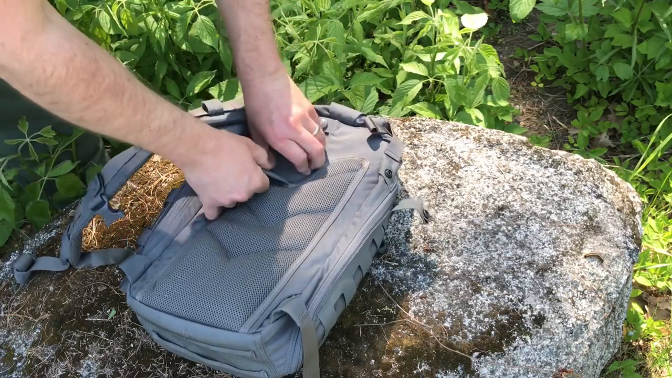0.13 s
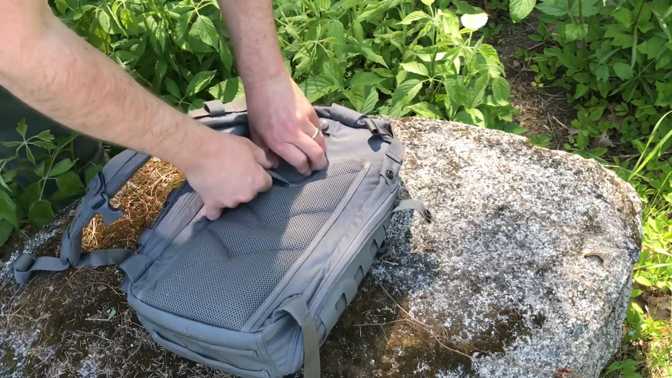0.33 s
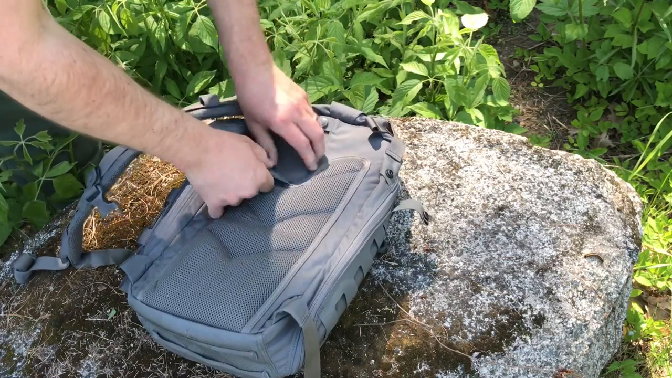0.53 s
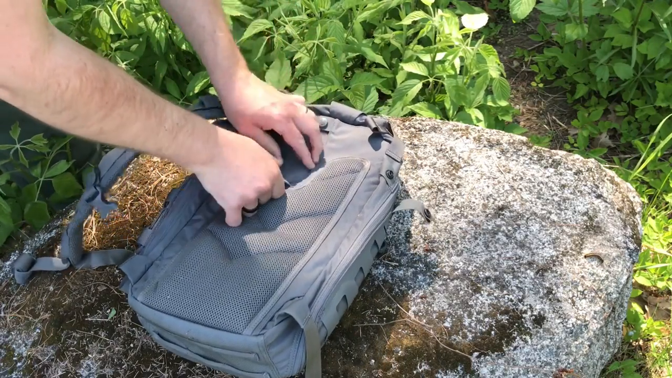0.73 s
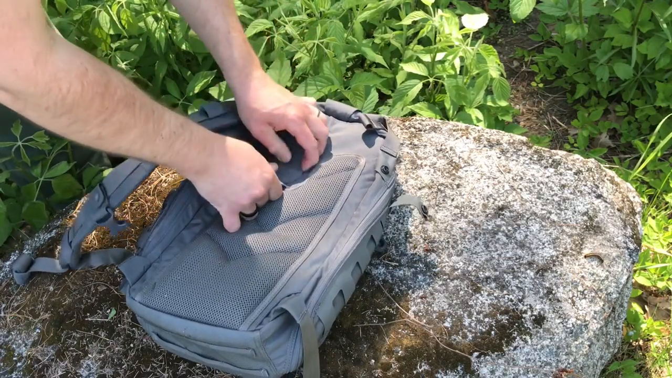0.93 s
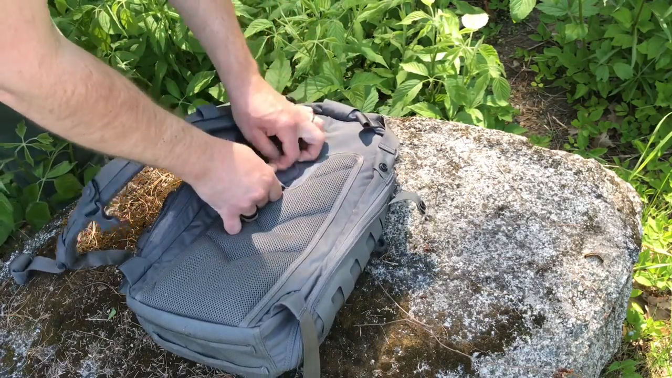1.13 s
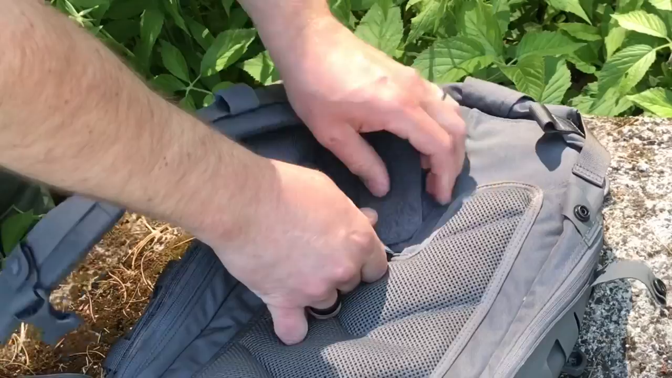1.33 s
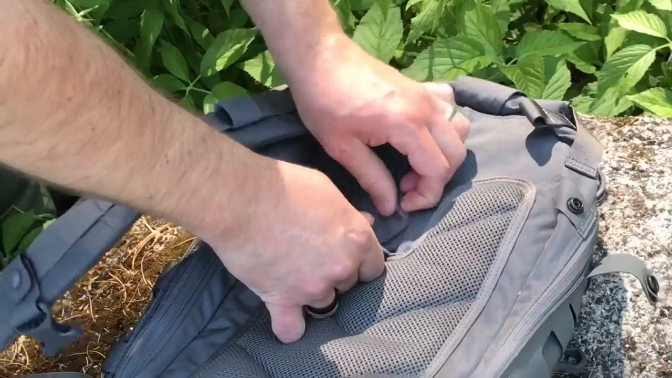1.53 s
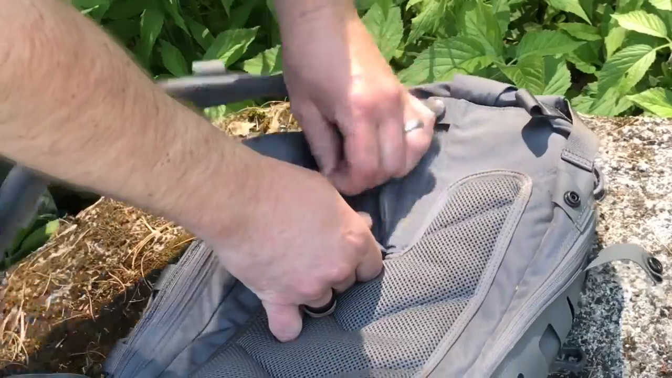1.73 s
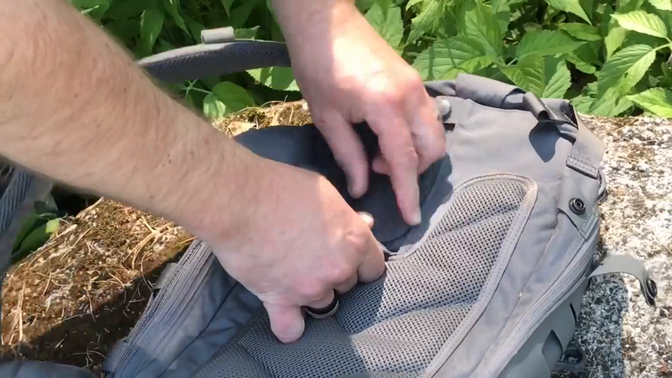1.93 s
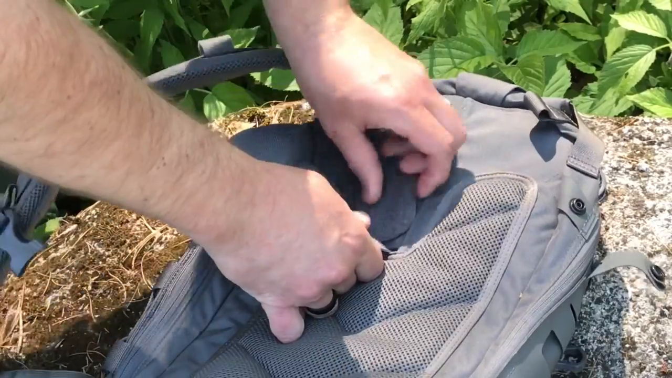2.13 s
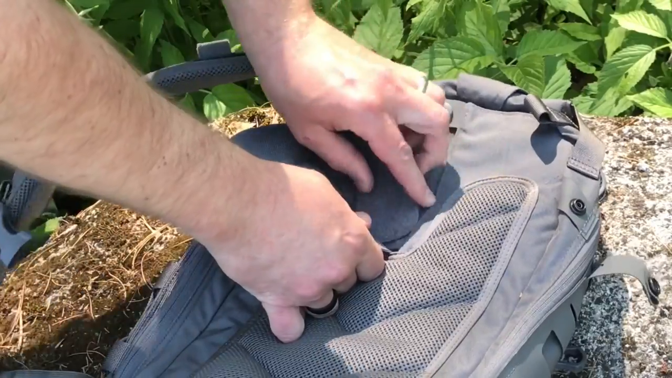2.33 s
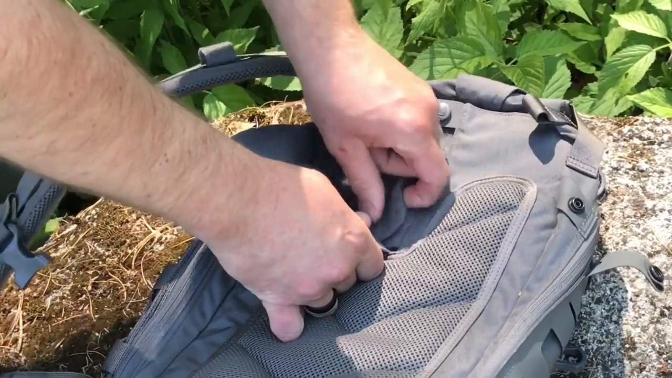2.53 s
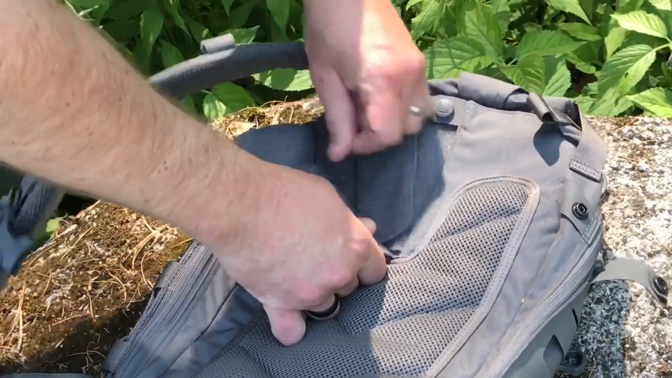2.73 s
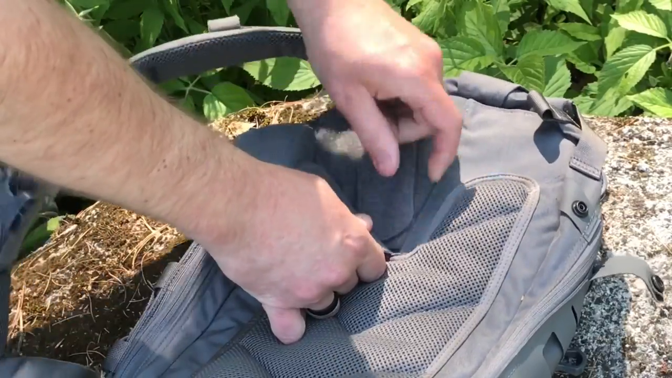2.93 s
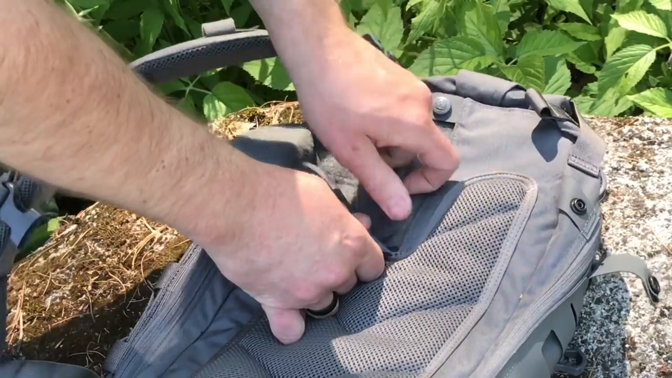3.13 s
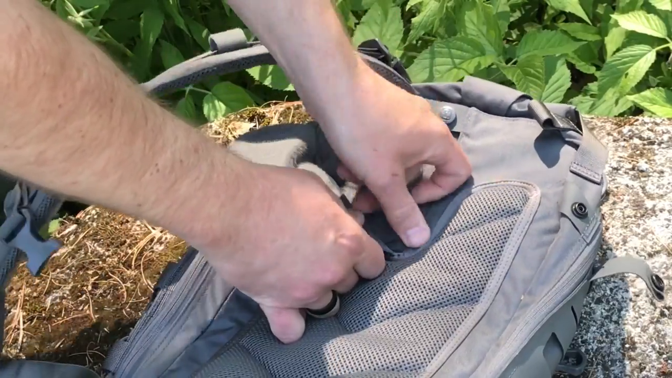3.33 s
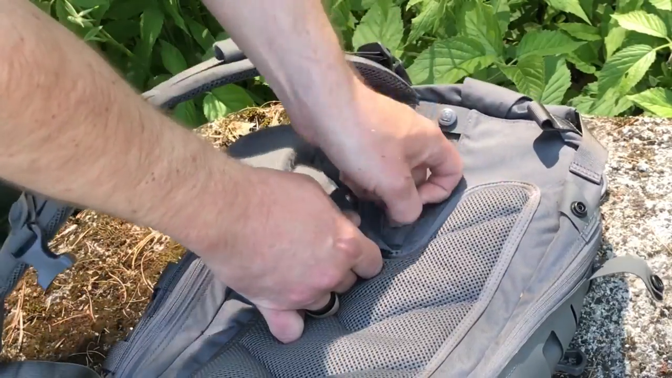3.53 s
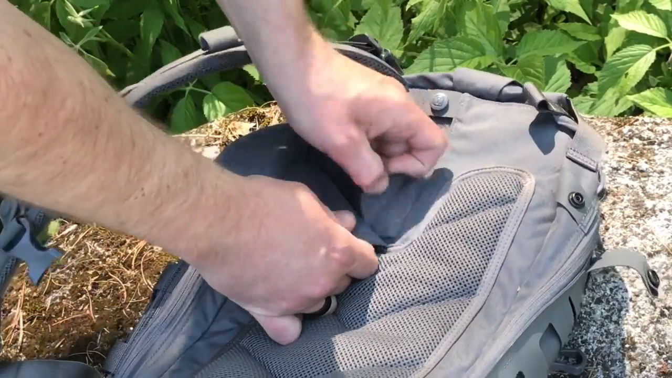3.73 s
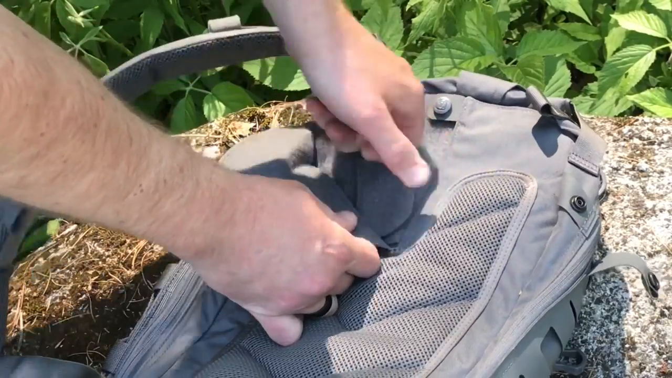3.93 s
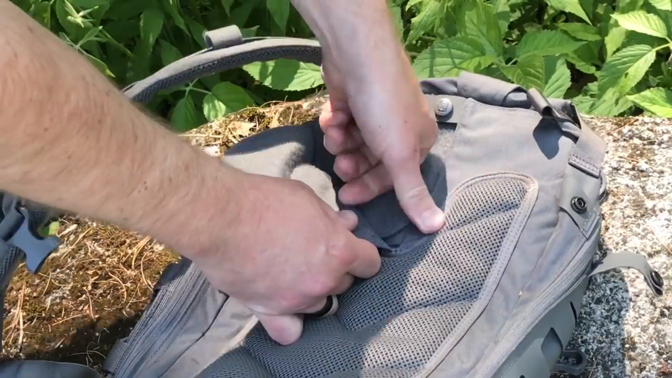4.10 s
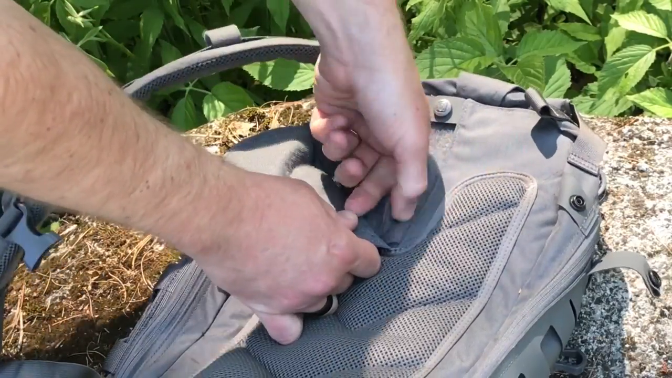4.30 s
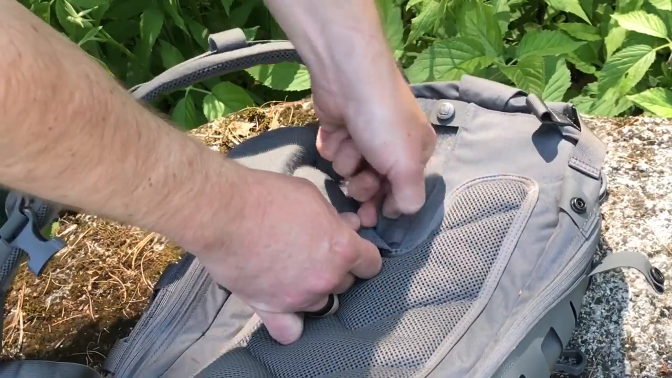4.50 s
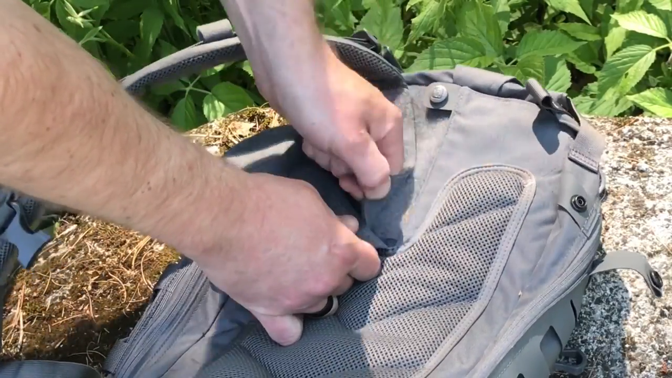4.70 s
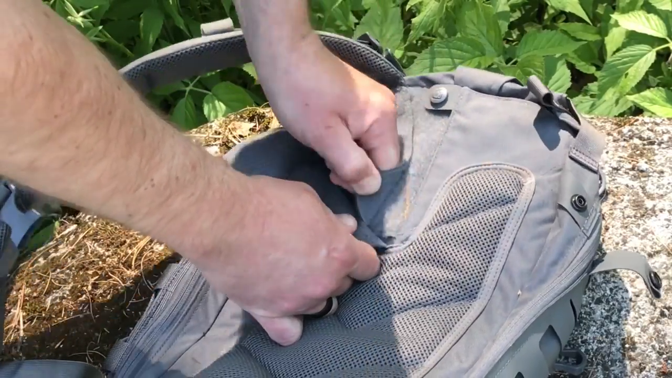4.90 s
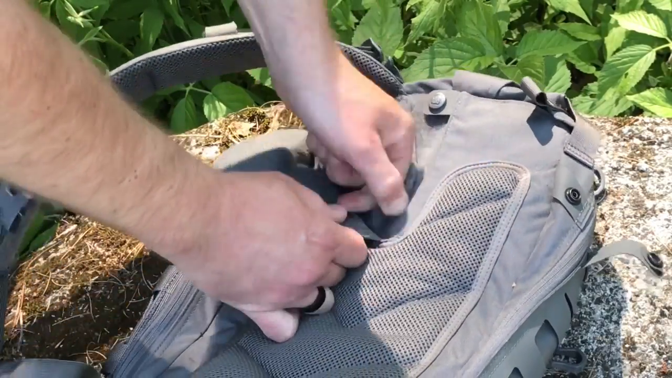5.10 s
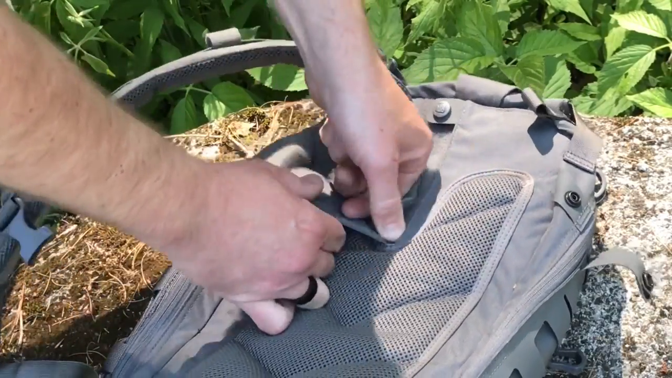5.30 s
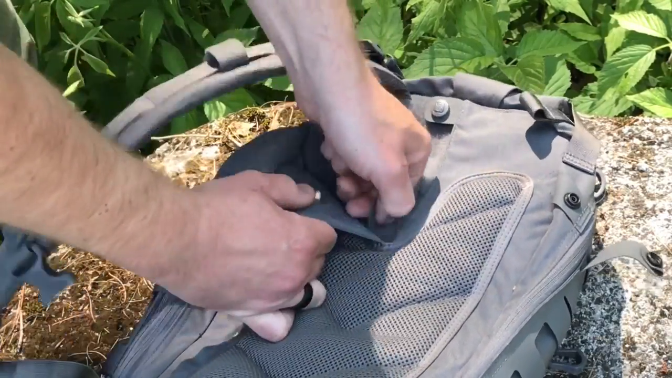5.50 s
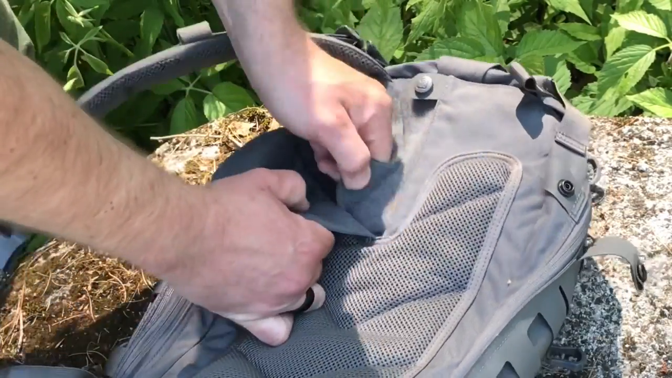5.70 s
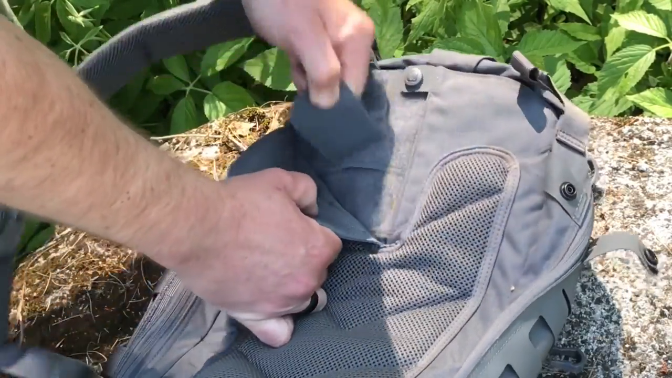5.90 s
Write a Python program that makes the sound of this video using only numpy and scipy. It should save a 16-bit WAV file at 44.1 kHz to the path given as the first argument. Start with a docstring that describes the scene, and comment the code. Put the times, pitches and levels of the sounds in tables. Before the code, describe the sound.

Close crisp clusters of hook-and-loop snaps and brief peels, with fabric rubs and dull padding flops between, ending on a sustained harsh rip.

```python
"""Outdoors and close by, over a low distant hum, a grip on a nylon backpack opens with a short rubbery creak.
A hand rubs the cloth, fingertips scuff the stretched panel and padding flops dully between tugs on the flap.
Hook-and-loop fastening lets go in snapping clusters and short peels; each click cracks, rings the taut panel
and knocks on the hollow bag. Last, the flap is torn open in one long rip that lasts to the end.
Filtered noise makes air and cloth, sines make hum and creak, and clicks through resonances make the flap."""
import sys
import numpy as np
from scipy import signal
from scipy.fft import rfft, irfft
from scipy.io import wavfile
from scipy.ndimage import uniform_filter1d

SR = 44100
rng = np.random.default_rng(int(sys.argv[2]) if len(sys.argv) > 2 else 0)


def transcribe(signal):
    """Save signal, clipped to [-1, 1], as a 16-bit WAV file at the path in sys.argv[1]."""
    frames = np.atleast_2d(signal).T
    limited = np.clip(frames, -1, 1)
    pcm = np.round(limited * 32767).astype(np.int16)
    wavfile.write(sys.argv[1], SR, pcm)


N = 266849
TIME = np.arange(N) / SR


def from_db(db):
    """Decibels to amplitude."""
    return 10 ** (np.asarray(db) / 20)


def rms_one(x):
    """Scale to a spread of 1."""
    return x / np.std(x)


def gain_curve(rows, column):
    """A level column [dB] as a gain over time, silent outside its rows."""
    rows = np.array(rows)
    return from_db(np.interp(TIME, rows[:, 0], rows[:, column], left=-np.inf, right=-np.inf))


def drift(rate):
    """Smooth chance with about `rate` turns a second; spread 1."""
    return rms_one(np.interp(TIME * rate, np.arange(N), rng.standard_normal(N)))


def swells(strokes):
    """Each stroke grows and fades in a bell-shaped swell."""
    return sum(from_db(db) * np.exp(-((TIME - middle) / length) ** 2) for middle, length, db in strokes)


def grains(per_s, spread_db):
    """Clicks at random moments, of uneven size and sign; rms 1."""
    sizes = from_db(spread_db * np.clip(rng.standard_normal(N), -2, 2))
    signs = rng.choice([-1, 1], N)
    return rms_one(sizes * signs * (rng.random(N) < per_s / SR))


def resonance(x, hz, width_hz):
    """One resonance, gain 1 on top."""
    return signal.lfilter(*signal.iirpeak(hz, hz / width_hz, fs=SR), x)


def coloured(x, spectrum, ripple_db=0, size=4096, count=60):
    """A causal filter of unit energy with this spectrum, plus chance resonances of ripple_db."""
    octave = np.log2(np.maximum(np.fft.rfftfreq(size, 1 / SR), 10))
    hz, db = np.transpose(spectrum)
    knots = np.log2(hz)
    skirts = 20 * np.abs(octave - np.clip(octave, knots[0], knots[-1]))   # 20 dB per octave beyond the ends
    ripple = np.interp(octave, np.linspace(octave[0], octave[-1], count), rng.standard_normal(count))
    level_db = np.interp(octave, knots, db) - skirts + ripple_db * ripple
    cepstrum = irfft(np.log(from_db(level_db)))
    response = irfft(np.exp(rfft(2 * cepstrum[:size // 2], size)))   # minimum phase: nothing sounds early
    return signal.oaconvolve(x, response / np.linalg.norm(response))[:N]


def scattered(clicks, spectrum, ripple_db, count=18, size=130):
    """The contact hops between spots of the fabric every 3 ms, each with resonances of its own."""
    spot = np.repeat(rng.integers(count, size=N // size + 1), size)[:N]
    return sum(coloured(clicks * (spot == k), spectrum, ripple_db) for k in range(count))


# colour of the still air: (frequency [Hz], relative level [dB])
AIR_COLOUR = [(25, -26.5), (78, 5), (130, -11.5), (260, -13), (800, -20.5), (16000, -37.5)]
# far hum partials, before they waver: (frequency [Hz], level at the start [dB], fade [dB per s])
HUM_PARTIALS = [(70, -52.5, 2), (103.4, -52.5, 8), (209.7, -56, 3.5)]


def background(air_db=-52, waver_db=2, wander_rad=.6, rate=6):
    """Still air as coloured noise, with far hum partials that waver and slowly fade."""
    sound = from_db(air_db) * coloured(rng.standard_normal(N), AIR_COLOUR)
    for hz, db, fade in HUM_PARTIALS:
        level = from_db(db - fade * TIME + waver_db * drift(rate))
        sound = sound + level * np.sin(2 * np.pi * hz * TIME + wander_rad * drift(rate))
    return sound


# colour of rubbed nylon: (frequency [Hz], relative level [dB])
NYLON_COLOUR = [(200, 3.5), (800, 1), (1450, 1), (2300, -0.5), (6000, -5.5), (8500, -1.5), (10400, -5.5),
                (12500, -0.5), (16000, -10)]
# strokes of a hand over the nylon: (middle time [s], half length [s], relative level [dB])
HAND_RUBS = [(.18, 0.066, -59.5), (.5, 0.046, -53), (.77, 0.16, -62), (1.14, 0.33, -63.5),
             (1.48, 0.15, -59.5), (1.81, 0.13, -48.5), (2.2, 0.06, -56), (3.363, 0.0048, -44),
             (3.48, 0.14, -59.5), (4.85, 0.26, -63), (5.29, 0.0086, -44.5), (5.45, 0.26, -54.5)]


def cloth(rub_db=3.0, grip_db=-68.5, flutter_db=10.5, crease_db=-7):
    """Skin drags over the weave in fine grains, a little unevenly; now and then a crease ticks."""
    friction = from_db(flutter_db * np.tanh(drift(63))) * grains(9000, spread_db=5.5)
    creases = from_db(crease_db) * grains(120, spread_db=9)
    pressure = from_db(grip_db) + swells(HAND_RUBS)   # a faint constant grip under the strokes
    return from_db(rub_db) * scattered((friction + creases) * pressure, NYLON_COLOUR, ripple_db=4.5)


# a short rubbery creak as the grip tightens: (time [s], mean slip rate [per s], level [dB])
GRIP_CREAK = [(.01, 260, -64), (.048, 390, -38.5), (.09, 200, -52)]


def creak(sharpness=1.0, jitter=0.11):
    """Stick and slip, speeding up and slowing again."""
    s, rate, _ = np.transpose(GRIP_CREAK)
    slip_rate = np.interp(TIME, s, rate) * (1 + jitter * drift(211))
    phase = 2 * np.pi * np.cumsum(slip_rate) / SR
    return gain_curve(GRIP_CREAK, 2) * np.sin(phase + sharpness * np.sin(2 * phase))


# the flap goes slack or a finger bumps the padding: (time [s], relative level [dB], swing pitch [Hz])
PADDING_FLOPS = [(0.877, -39.5, 377), (0.986, -32.5, 473), (1, -38.5, 520), (1.172, -23, 400),
                 (2.098, -35.5, 376), (2.59, -28, 349), (2.815, -25, 298), (3.363, -41.5, 352),
                 (3.878, -32.5, 177), (4.543, -27, 596)]


def flops(cycles=0.86, crumple=0.92):
    """Padded cloth swings for a cycle or two and crumples dully."""
    out, t = np.zeros(N), TIME[:SR // 10]
    for s, db, hz in PADDING_FLOPS:
        age = t * hz / cycles
        band = signal.butter(2, [hz / 2, hz * 2], "band", fs=SR)
        dull = rms_one(signal.lfilter(*band, rng.standard_normal(len(t))))
        swing = np.sin(2 * np.pi * hz * t) / 2
        at = int(s * SR)
        out[at:at + len(t)] += from_db(db) * age * np.exp(1 - age) * (swing + crumple * dull)
    return out


# a fingertip scuffs the stretched panel: (middle time [s], half length [s], level [dB], ring pitch [Hz])
FINGER_SCUFFS = [(0.516, 0.011, -44, 1020), (1.265, 0.0035, -34, 1550), (1.497, 0.0048, -38, 1550),
                 (1.833, 0.029, -37.5, 1650), (1.92, 0.0023, -33.5, 1060), (2.179, 0.017, -43, 1650),
                 (2.282, 0.013, -45.5, 1120), (5.186, 0.052, -45.5, 1428), (5.289, 0.018, -42, 1600),
                 (5.357, .01, -41, 650)]


def scuffs(width_share=0.73):
    """Dense friction grains swell in one resonance of the panel, pitched by where the finger presses."""
    friction = grains(1700, spread_db=8.5)
    sound = np.zeros(N)
    for middle, length, db, hz in FINGER_SCUFFS:
        once = resonance(friction, hz, width_share * hz)
        twice = resonance(once, hz, width_share * hz)   # steeper sides
        sound += swells([(middle, length, db)]) * rms_one(twice)
    return sound


# each tug on the flap sets off a crackle of small snaps and tunes the panel:
# (start time [s], length [s], relative crackle level [dB], panel over crack drive [dB], ring pitch [Hz])
FLAP_TUGS = [(.9, 0.076, -40, 2, 2220), (1.068, 0.13, -18, -2.5, 1670), (1.514, 0.18, -20, -3.5, 1411),
             (2.645, 0.15, -10, -6, 1400), (3.487, 0.093, -14, -6, 1345), (3.645, 0.19, -11.5, -6, 1450),
             (4.382, 0.073, -17.5, -6.5, 1570), (4.545, 0.078, -20, -7.5, 1496),
             (4.667, 0.135, -19.5, -5.5, 1234), (4.824, 0.13, -21, -3, 1264),
             (5.018, 0.08, -11.5, -2, 1131), (5.429, 0.1, -28, 0.5, 1485), (5.733, 0.16, -7, -2.5, 1639)]


def tension(s, slack_db=-10):
    """Panel drive [dB] and ring pitch [Hz] at time s: slack at first, steady in a tug, gliding between tugs."""
    held = np.array([(at, db, hz) for start, length, _, db, hz in FLAP_TUGS
                     for at in (start, start + length)])
    panel_db = np.interp(s, held[:, 0], held[:, 1], left=slack_db)
    return panel_db, np.interp(s, held[:, 0], held[:, 2])


def crackle(snaps_per_s=135, jitter=0.61, spread_db=4.5, hold_s=.009, count=40):
    """In a tug the load builds and slips unevenly: small snaps (time, level), held back before a big one."""
    snaps, big = [], np.array(BIG_SNAPS)[:, 0]
    for start, length, db, _, _ in FLAP_TUGS:
        late, size = rng.standard_normal((2, count))
        times = start + (np.arange(count) + .5 + jitter * late) / snaps_per_s   # jitter: share of the interval
        for s, z in zip(times, size):
            holding = np.any((big > s) & (big < s + hold_s))
            if s < start + length and not holding:
                snaps.append((s, db + spread_db * z))
    return snaps


# big clusters of hooks that stand out alone: (time [s], relative level [dB])
BIG_SNAPS = [(.283, -11.5), (.318, -16), (.908, -11.5), (0.948, -8.5), (.969, -17), (1.032, -18),
             (1.095, -9), (1.106, -9), (1.113, -11), (1.121, -5.5), (1.133, -9.5), (1.198, -4),
             (1.211, -14), (1.283, -11.5), (1.555, -5), (1.574, -6), (1.598, -11), (1.611, -4.5),
             (1.643, -2.5), (1.649, -7), (1.657, -2.5), (1.67, -11.5), (1.807, -8), (1.957, -17.5),
             (2.096, -17), (2.513, -17), (2.538, -7), (2.565, -5.5), (2.59, -0.5), (2.645, -4), (2.651, 4),
             (2.673, -0.5), (2.685, 1.5), (2.689, 0.5), (2.716, -18), (2.729, 3.5), (2.746, -3.5),
             (2.767, 4.5), (2.776, 2), (3.222, -8.5), (3.243, -1.5), (3.252, -7.5), (3.501, -4), (3.536, 0),
             (3.545, 4), (3.643, -6), (3.654, -5), (3.701, -9.5), (3.775, -2.5), (3.786, -6), (3.83, -0.5),
             (4.368, -7), (4.386, -0.5), (4.398, -0.5), (4.403, -3), (4.413, -2.5), (4.425, -9.5),
             (4.433, -3.5), (4.479, -8), (4.501, -10.5), (4.542, -1), (4.573, -1.5), (4.595, -5.5),
             (4.615, -8.5), (4.664, -7), (4.672, -4), (4.688, -4.5), (4.708, -1), (4.712, -3),
             (4.738, -6.5), (4.744, -6.5), (4.77, -6), (4.779, -9.5), (4.833, -8), (4.842, -1.5),
             (4.855, -6.5), (4.865, -4.5), (4.88, -7), (4.89, -10.5), (4.923, -7.5), (4.929, -6.5),
             (4.959, -8), (5.022, -3), (5.03, -6.5), (5.045, -9.5), (5.063, -4), (5.069, -9.5),
             (5.092, -10.5), (5.113, -14), (5.45, -13.5), (5.532, -13), (5.574, -11), (5.602, -10.5),
             (5.675, -8.5), (5.689, -4), (5.697, 0), (5.711, -2), (5.725, -8)]


def snap_clicks(spread_s=.0014, fall_db=8.5, strong_db=-3.5, growth=.035,
                stray_db=-14, stray_after_s=.0015, stray_s=0.0046, count=7, size=600):
    """A hook throws its load on its neighbours: after a harder snap they follow stronger and wider spread."""
    clicks, shape = np.zeros(N + SR), (size, count)
    lags, signs = rng.uniform(-2, 2, shape), rng.choice([-1, 1], shape)
    stray_lags, stray_sizes = rng.standard_normal(shape), rng.laplace(size=shape)
    snaps = BIG_SNAPS + crackle()
    for (s, db), lag, sign, stray_lag, stray_size in zip(snaps, lags, signs, stray_lags, stray_sizes):
        avalanche = np.exp(growth * (db - strong_db))
        delays = spread_s * avalanche * lag
        delays[0] = 0
        sizes = from_db(-fall_db / avalanche * np.sqrt(np.arange(count))) * sign
        at = ((s + spread_s / 2 + delays) * SR).astype(int)
        clicks[at] += from_db(db) * sizes / np.linalg.norm(sizes)
        # weakly held hooks slip just before and, more often, just after
        strays = s + avalanche * (stray_after_s + stray_s * stray_lag)
        clicks[(strays * SR).astype(int)] += from_db(db + stray_db) * avalanche * stray_size / 2
    return clicks[:N]


# continuous peels, the last two tear the flap open; levels are drives at mid-peel: (start time [s],
# length [s], crack level [dB], panel ring level [dB], bag hollow level [dB], swell [dB per s])
FLAP_PEELS = [(1.153, 0.018, -29.5, -31.5, -41, 202), (1.717, 0.028, -33.5, -37.5, -53, 60),
              (1.744, 0.057, -23, -23.5, -33.5, -84), (2.775, 0.039, -31, -35, -51.5, -3),
              (3.716, 0.04, -30, -35.5, -45, 60), (3.796, 0.04, -28.5, -29.5, -43, 86),
              (3.832, 0.0469, -37.5, -33.5, -47.5, -52), (5.738, 0.165, -27, -31, -42.5, 48.5),
              (5.905, 0.42, -19, -22.5, -34, -8.5)]


def peel_clicks(hooks_per_s=2600, full_db=-20, thinning=0.86, surge_db=2.5, surge_rate=330, size=700,
                attack_s=0.0053, release_s=0.0045):
    """The peel line advances in jerks; a weaker pull frees fewer hooks. Drives crack, panel and hollow."""
    pull = np.zeros((3, N))
    for start, length, crack_db, panel_db, hollow_db, swell in FLAP_PEELS:
        age = TIME - start
        gate = np.interp(age, [-attack_s, 0, length, length + release_s], [0, 1, 1, 0])
        on = gate > 0
        envelope = gate[on] * from_db(swell * (age[on] - length / 2))
        drives = np.outer(from_db([crack_db, panel_db, hollow_db]), envelope)
        pull[:, on] = np.maximum(pull[:, on], drives)
    rate = hooks_per_s * (pull[0] / from_db(full_db)) ** thinning
    clicks = grains(rate, spread_db=3.5) * from_db(surge_db * drift(surge_rate))
    local_rms = np.sqrt(uniform_filter1d(clicks ** 2, size) + 1e-6)
    return pull * clicks / local_rms   # evened out, so the pull sets the level


def panel_ring(clicks, low_hz=515, width_hz=400, detune=0.047, size=1100):
    """The panel rings a few cycles at the pull's pitch, detuned by chance every 25 ms; it radiates few lows."""
    out, t = np.zeros(N + 2 * size), TIME[:size]
    starts = np.arange(0, N - size, size)
    for at, ring_hz in zip(starts, tension(starts / SR)[1]):
        hz = ring_hz * np.exp(detune * rng.standard_normal())
        ring = np.exp(-np.pi * width_hz * t) * np.sin(2 * np.pi * hz * t)
        out[at:at + 2 * size - 1] += np.convolve(clicks[at:at + size], ring / np.linalg.norm(ring))
    return signal.sosfilt(signal.butter(2, low_hz, "high", fs=SR, output="sos"), out[:N])


def taut_flap(crack, ring_hz=3780, width_hz=700, ring_db=-2):
    """While the flap is pinched short, its stiff backing adds a narrow ring."""
    pinched = (TIME > 3.6) & (TIME < 4.8)
    return from_db(ring_db) * resonance(crack * pinched, ring_hz, width_hz)


# resonances of the flap pulled out long for the last rip: (frequency [Hz], width [Hz], level [dB])
LONG_FLAP = [(1065.7, 440, 13.5), (5464, 1380, -2.5)]


def open_flap(clicks):
    """Pulled out to its full length, the flap roars in its own resonances."""
    pulled = clicks * (TIME > 5.72)
    return sum(from_db(db) * resonance(pulled, hz, width_hz) for hz, width_hz, db in LONG_FLAP)


# colour of the hooks' crack: (frequency [Hz], relative level [dB])
HOOK_COLOUR = [(500, -25), (2100, 3), (2700, 4.5), (4300, 4.5), (5500, -4.5), (7000, 1.5), (8700, 3),
               (10500, -5), (13500, -3), (16000, -7.5)]
# colour of the panel's broad ring: (frequency [Hz], relative level [dB])
PANEL_COLOUR = [(300, -21.5), (570, -9), (760, -7), (1050, 2.5), (1450, -5.5), (1900, -1), (5000, -27)]
# colour of the knock on the hollow bag: (frequency [Hz], relative level [dB])
HOLLOW_COLOUR = [(90, -19), (220, -1.5), (330, 0), (560, 6.5), (730, 7), (1400, -6.5)]


def fastener(crack_db=0.45, broad_db=-10, snap_hollow_db=-16.5, peel_hollow_db=6.0):
    """Each release cracks, rings the panel and knocks on the hollow bag."""
    peel_crack, peel_panel, peel_hollow = peel_clicks()
    snaps = snap_clicks()
    snap_panel = snaps * from_db(tension(TIME)[0])
    crack = from_db(crack_db) * scattered(snaps + peel_crack, HOOK_COLOUR, ripple_db=3.5)
    panel = scattered(from_db(broad_db) * snap_panel + peel_panel, PANEL_COLOUR, ripple_db=1.5)
    knocks = from_db(snap_hollow_db) * snaps + from_db(peel_hollow_db) * peel_hollow
    hollow = scattered(knocks, HOLLOW_COLOUR, ripple_db=5.5)
    return crack + taut_flap(crack) + open_flap(peel_panel) + panel + panel_ring(snap_panel) + hollow


def diffuse_echo(x, level_db, t60):
    """A diffuse, slightly dull echo: decaying noise that falls 60 dB in t60 seconds."""
    noise = rng.standard_normal(SR) * from_db(-60 * TIME[:SR] / t60)
    tail = signal.lfilter(*signal.butter(1, 5000, fs=SR), noise)
    return from_db(level_db) * signal.oaconvolve(x, tail / np.linalg.norm(tail))[:N]


def scene():
    """Arms and rock scatter a little sound at once, the foliage a faint tail; one channel."""
    bag = cloth() + creak() + flops() + scuffs() + fastener()
    arms_and_rock = diffuse_echo(bag, level_db=-19.5, t60=0.027)
    foliage = diffuse_echo(bag, level_db=-33.5, t60=0.98)
    return (background() + foliage + arms_and_rock + bag)[None]


def record(dry):
    """The highest peaks are rounded, the top is cut above 16 kHz."""
    rounded = np.tanh(dry)
    return signal.sosfilt(signal.ellip(10, .2, 80, 16000, fs=SR, output="sos"), rounded)


dry = scene()
out = record(dry)
transcribe(out)
```